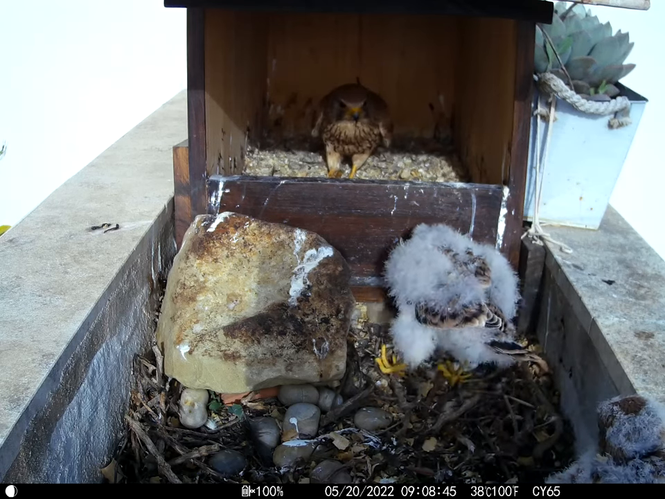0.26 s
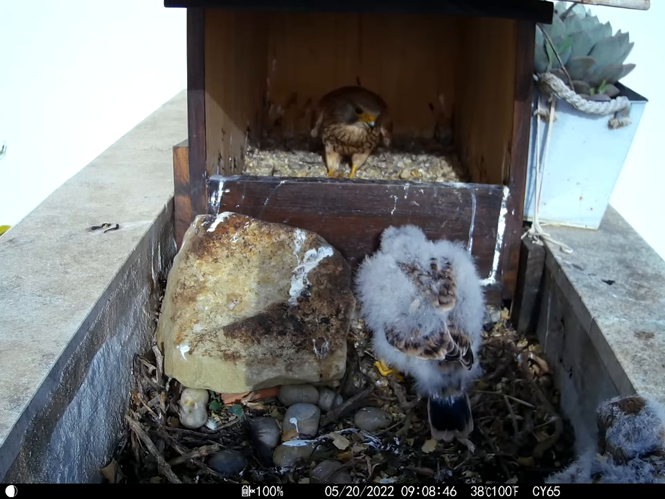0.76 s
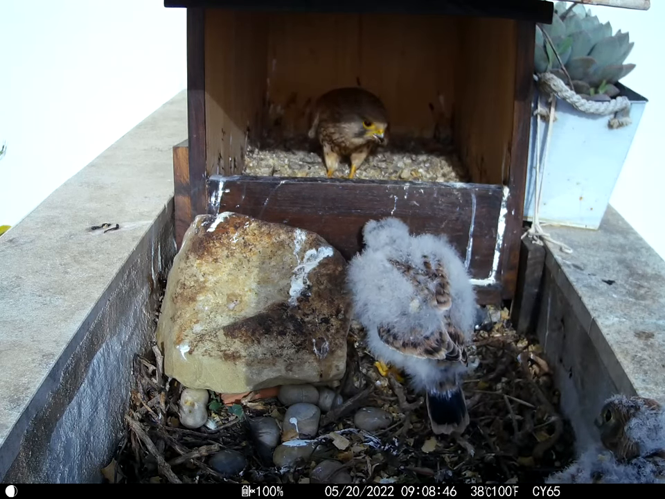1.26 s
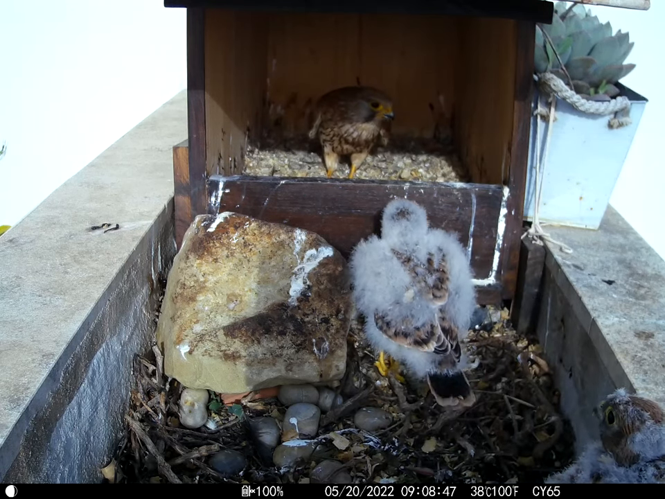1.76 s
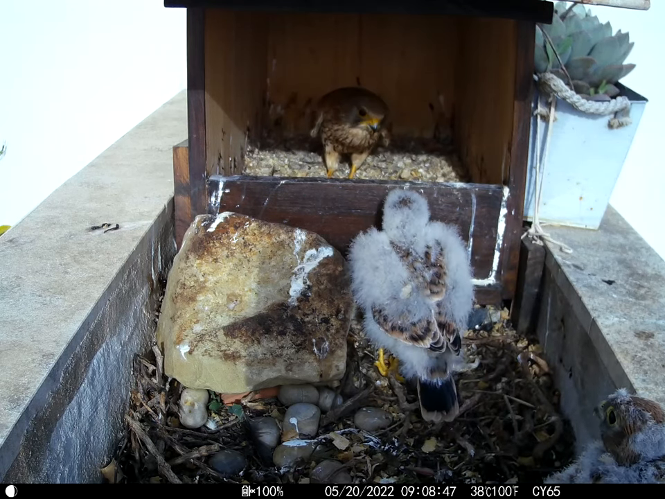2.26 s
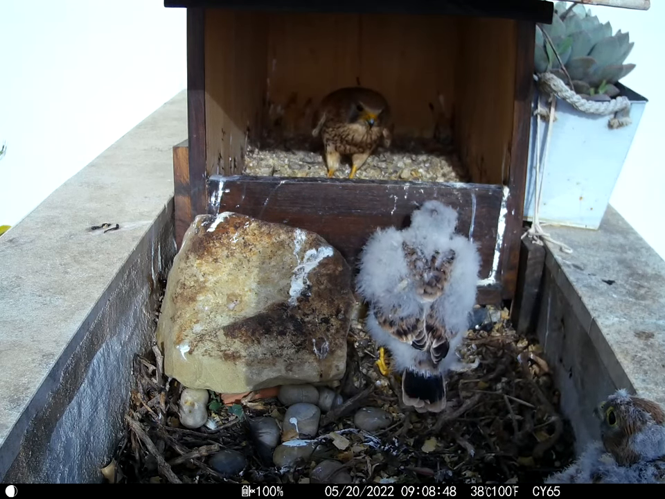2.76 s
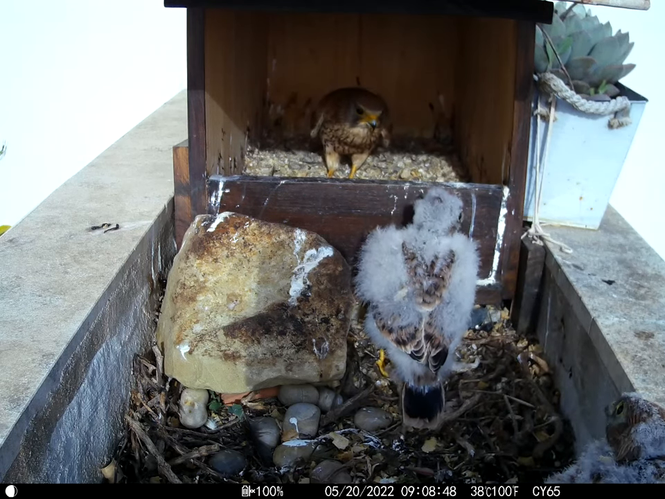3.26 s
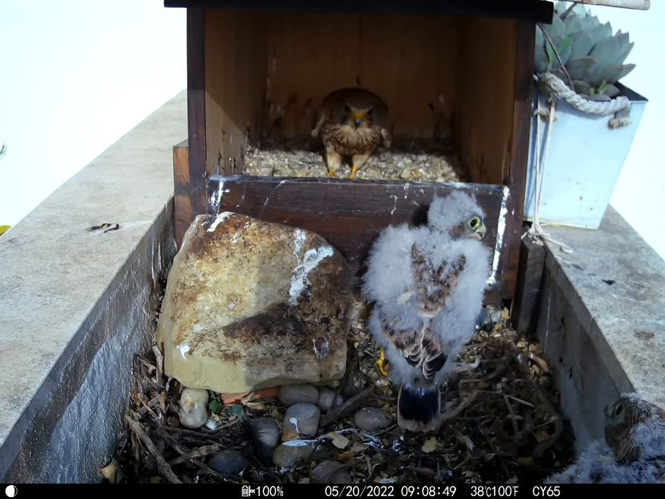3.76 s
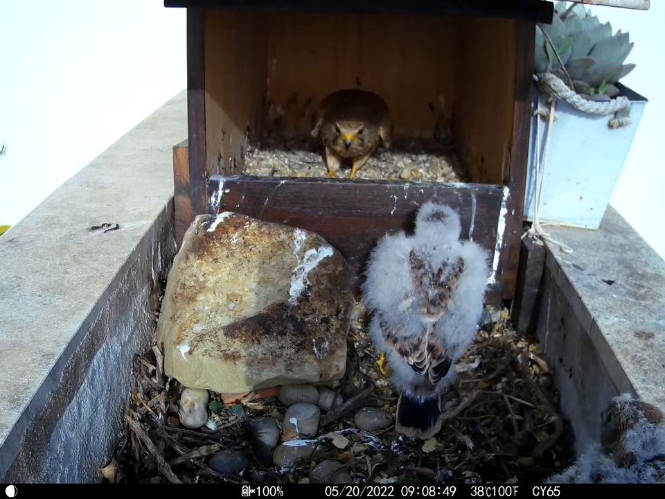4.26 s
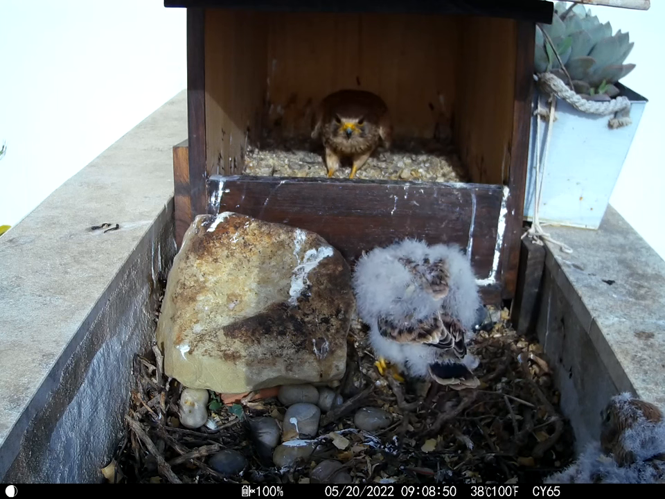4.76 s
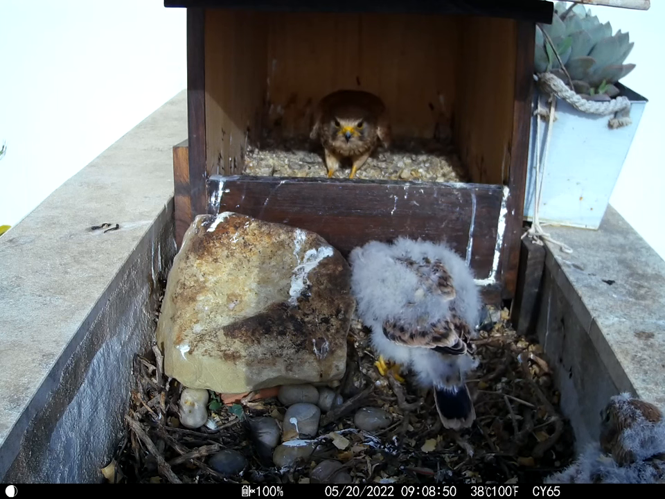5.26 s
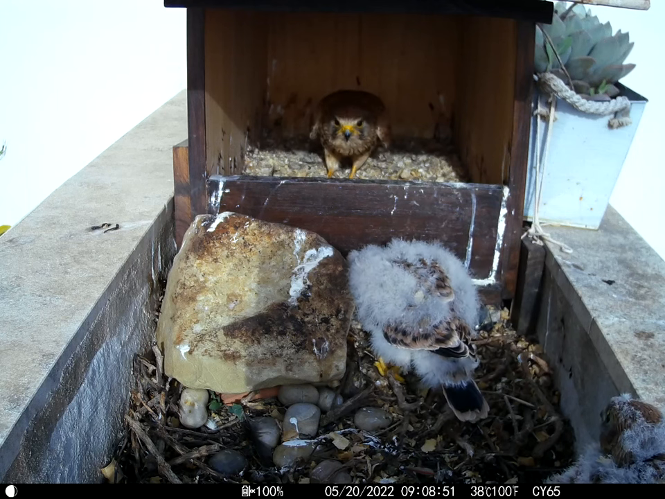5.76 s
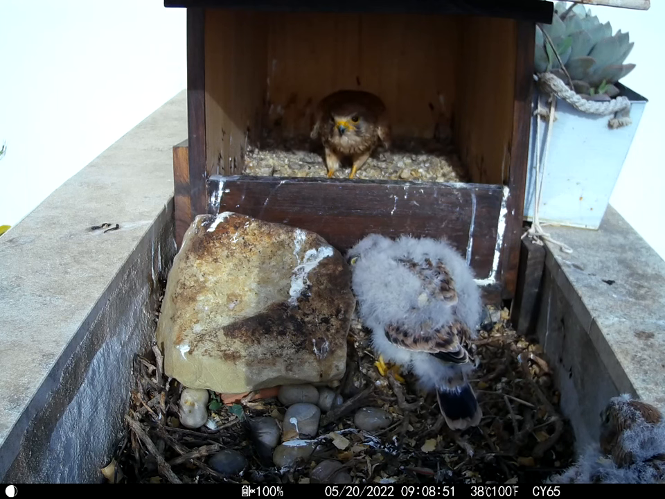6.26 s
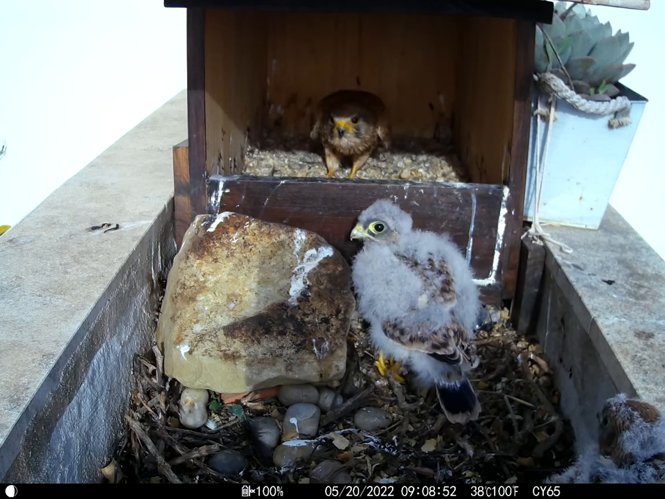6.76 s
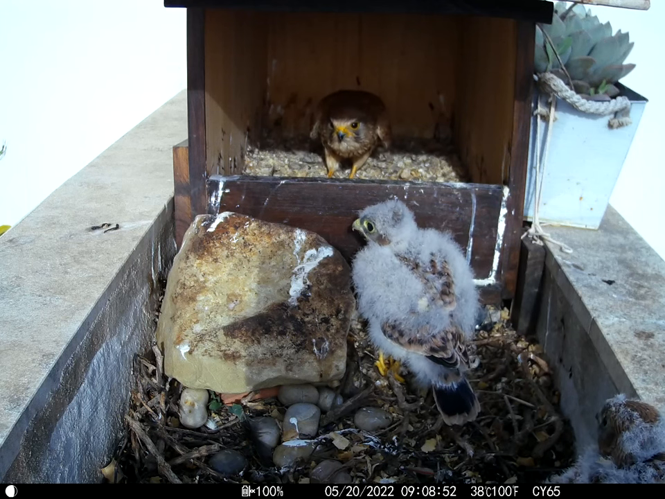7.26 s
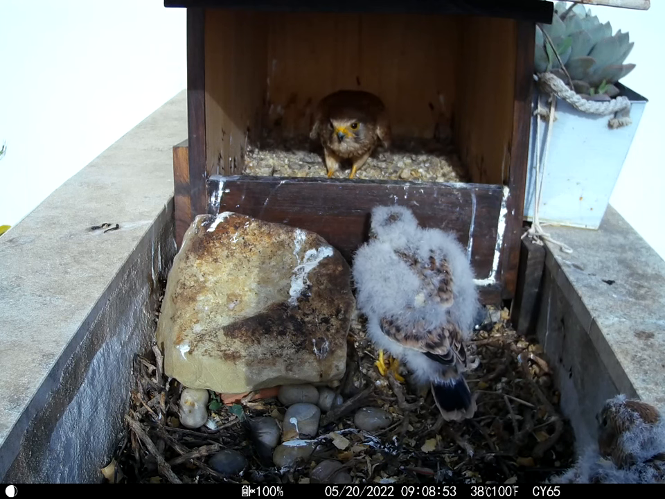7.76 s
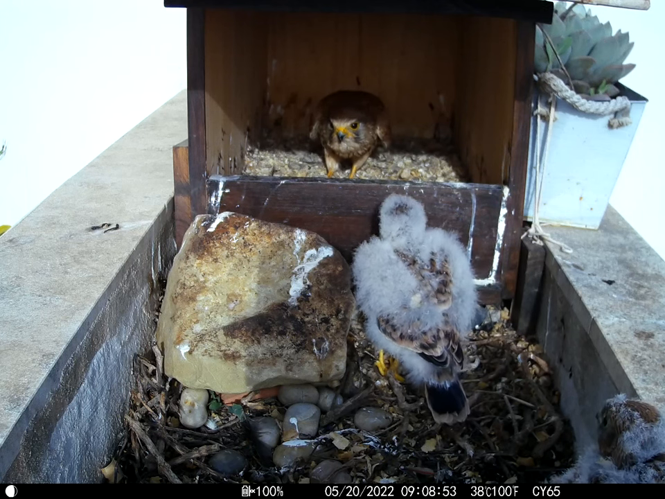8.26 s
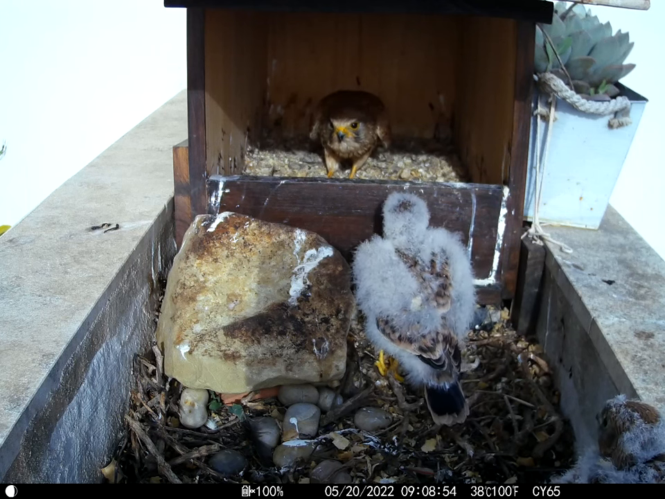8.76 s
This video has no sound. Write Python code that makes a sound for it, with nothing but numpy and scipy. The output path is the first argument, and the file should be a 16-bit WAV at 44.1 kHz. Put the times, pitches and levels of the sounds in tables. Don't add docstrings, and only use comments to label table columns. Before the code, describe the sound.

Close high trills from hungry young falcons, punctuated by seven sharp adult yelps, pause and then return over steady hiss, thin whine and ticks.

```python
import sys
import numpy as np
from scipy import signal
from scipy.fft import rfft, irfft
from scipy.io import wavfile
from scipy.ndimage import uniform_filter1d

SR = 44100
rng = np.random.default_rng(int(sys.argv[2]) if len(sys.argv) > 2 else 0)


def makeup_ratio(level_db):
    decades = np.asarray(level_db, float) / 20
    return 10 ** decades


def pcm_store(signal):
    levels = np.round(np.clip(np.atleast_2d(signal), -1, 1) * 32767)
    wavfile.write(sys.argv[1], SR, levels.astype(np.int16).T)


N = 398223
T = np.arange(N) / SR


def band(x, lo_hz, hi_hz):
    return signal.sosfilt(signal.butter(2, [lo_hz, hi_hz], "band", fs=SR, output="sos"), x)


def unit(x):
    return x / np.sqrt(np.mean(x ** 2))


def add(out, start_s, x):
    i = int(start_s * SR)
    out[i:i + len(x)] += x[:len(out) - i]


def town():
    # pitch_hz [Hz], level_db [dB per Hz]
    spectrum = [(12, -34), (20, -7.5), (113, 1), (216, -5), (357, -9.5), (6180, -26.5), (9670, -29.5),
                (16000, -31)]
    hz, db = np.transpose(spectrum)
    f = np.fft.rfftfreq(N, 1 / SR)
    tilt = makeup_ratio(np.interp(np.log(f + 1), np.log(hz), db))
    rumble = irfft(rfft(rng.standard_normal(N)) * tilt, N)
    swell = unit(uniform_filter1d(rng.standard_normal(N), SR // 3))
    return makeup_ratio(-53.5 + 1.1 * swell) * unit(rumble)


def electronics():
    # pitch_hz [Hz], level_db [dB]
    whine = [(4689, -77), (6250, -76.5), (9372, -75.5), (10939, -80)]
    beacon_first_s, beacon_every_s, beacon_length_s = .0886, .1024, .00272
    clock_first_s, clock_every_s = .4245, .9995
    out = sum(np.sqrt(2) * makeup_ratio(db) * np.sin(2 * np.pi * hz * T) for hz, db in whine)
    t = np.arange(80) / SR
    spike = np.exp(-t / 0.00026)
    step = np.exp(-t / 0.00033)
    for s in np.arange(beacon_first_s, T[-1], beacon_every_s):
        add(out, s, -makeup_ratio(-39.5) * spike)
        add(out, s + beacon_length_s, makeup_ratio(-42.5) * spike)
    for s in np.arange(clock_first_s, T[-1], clock_every_s):
        for lag_s, sign in (0, -1), (.0005, 1), (.0015, -1):
            add(out, s + lag_s, sign * makeup_ratio(-40.5) * step)
    return out


def sparrows():
    # start_s [s], length_s [s], first_hz [Hz], last_hz [Hz], level_db [dB]
    peeps = [
        (7.13, 0.056, 4550, 4400, -62),
        (4.6, .06, 3300, 3000, -60),
        (7.656, 0.081, 4550, 4700, -65),
        (2.396, 0.022, 4000, 3800, -54),
    ]
    out = np.zeros(N)
    for s, length_s, first_hz, last_hz, db in peeps:
        n = int(length_s * SR)
        turn = 2 * np.pi * np.cumsum(np.linspace(first_hz, last_hz, n)) / SR
        add(out, s, 2 * makeup_ratio(db) * np.sin(turn) * np.hanning(n))
    return out


def litter():
    # start_s [s], length_s [s], pitch_hz [Hz], level_db [dB]
    rustles = [
        (4.086, 0.045, 3500, -59),
        (4.293, 0.055, 2180, -55),
        (5.59, 0.12, 5800, -60),
        (7.074, 0.075, 3200, -58.5),
        (7.551, 0.1, 3020, -60),
        (8.121, 0.033, 990, -51),
    ]
    out = np.zeros(N)
    for s, length_s, hz, db in rustles:
        grit = rng.standard_normal(8192) ** 3
        n = int(length_s * SR)
        add(out, s, makeup_ratio(db) * unit(band(grit, hz / 2, hz * 2))[:n] * np.hanning(n))
    return out


def beak_snaps():
    # [dB, peak]
    snaps = [(0.599, -26.5), (1.1492, -27.5), (1.6866, -28.5), (2.278, -27), (3.0795, -27.5), (3.611, -29),
             (4.7316, -26)]
    out = np.zeros(N)
    t = np.arange(int(0.012 * SR)) / SR
    for s, db in snaps:
        grit = rng.standard_normal(len(t)) ** 2 * rng.choice([-1, 1], len(t))
        grit *= np.clip(1 - t / 0.0077, 0, 1) ** 0.3
        grit[0] = -8
        dull = unit(band(grit, 1300, 3320))
        bright = unit(band(grit, 2000, 6100))
        add(out, s, makeup_ratio(db - 11.5) * (dull + (.3 + t / .012) * 0.99 * bright))
    return out


def parent_yelps():
    # start_s [s], open_hz [Hz], broken_hz (pitch after the break) [Hz], level_db [dB], break_ms [ms]
    yelps = [(0.6246, 2890, 2930, -15, 3.2), (1.1741, 2940, 2974, -15.5, 3.7),
             (1.7112, 2870, 2958, -17.5, 6.4), (2.3022, 2905, 2870, -16.5, 7),
             (3.1043, 2795, 2827, -14.5, 5.7), (3.635, 2813, 2850, -14.5, 7.5),
             (4.7559, 2940, 3148, -13.5, 4.7)]
    odd_levels = [-3, -4, -3, -4.5, -2, -3.5, 3]
    open_levels = [0.5, 1, -14.5]
    broken_levels = [-6, -2.5, -2, -8, -18.5, -22]
    length_ms = 16.4
    out = np.zeros(N)
    t = np.arange(int(.07 * SR)) / SR
    ms = t * 1000
    for (s, open_hz, broken_hz, db, break_ms), odd_db in zip(yelps, odd_levels):
        broken = np.clip((ms - break_ms) / 2.15 + .5, 0, 1)
        hz = (open_hz + (broken_hz - open_hz) * broken) * (1 + 0.3 * np.exp(-t / 0.00087))
        shake = (0.013 + 0.013 * (ms / length_ms) ** 2) * unit(band(rng.standard_normal(len(t)), 150, 1180))
        turn = np.pi * np.cumsum(hz * (1 + shake)) / SR
        first = sum(makeup_ratio(d) * np.sin(2 * (k + 1) * turn) for k, d in enumerate(open_levels))
        second = sum(makeup_ratio(d + odd_db * (k in (2, 4))) * np.sin((k + 1) * turn - 1.3 * k ** 2)
                     for k, d in enumerate(broken_levels))
        air = rng.standard_normal(len(t)) * (1 + 0.27 * np.cos(turn))
        late = np.exp(-((ms - 0.65 * length_ms) / 4.8) ** 2)
        rasp = late * makeup_ratio(-11.5) * unit(band(air, 3700, 15500))
        attack = 1 - np.exp(-(t / 0.002) ** 2)
        shape = attack / (1 + np.exp((ms - 0.88 * length_ms) / 0.65))
        hiss = makeup_ratio(-28.5) * unit(band(air, 1980, 15000)) * np.exp(-t / 0.025) * (ms > length_ms / 2)
        voice = (1 - broken) * first + broken * second + rasp
        add(out, s, makeup_ratio(db) * (shape * voice + hiss))
    return out


def rising(rows):
    s, *rest = np.transpose(rows)
    return np.maximum.accumulate(np.maximum(s, 0)) + 1e-5 * np.arange(len(s)), *rest


def phrase(pulses, breath, voice):
    lead_s, tail_s, first_db, last_db = breath
    low_at, climb, upper_db = voice
    s, hz, sag, low, high = pulses[0]
    turns = [(s - lead_s, hz * (1 - climb * lead_s))]
    levels = [(s - lead_s, low - first_db, high - first_db - upper_db)]
    for k, (s, hz, sag, low, high) in enumerate(pulses):
        fade = first_db + (last_db - first_db) * k / max(len(pulses) - 1, 1)
        thin = np.clip((fade - 4.5) / (12 - 4.5), 0, 1)
        muted = 0.82 * thin
        turns.append((s, hz))
        levels.append((s, low - muted * fade, high - muted * (fade + upper_db)))
        if k + 1 < len(pulses):
            period = pulses[k + 1][0] - s
            turns.append((s + low_at * period, hz - sag))
            levels.append((s + .27 * thin * period, low, high))
            levels.append((s + (low_at + 0.079 * thin) * period, low - fade, high - fade - upper_db))
    hold_s = .55 * tail_s
    turns += [(s + hold_s, hz - 0.37 * sag), (s + tail_s, hz - sag)]
    levels += [(s + hold_s, low, high - 3), (s + tail_s, low - 14.5, high - 14.5 - 16)]
    return rising(turns), rising(levels)


def glide(s, hz, t):
    slope = np.diff(hz) / np.diff(s)
    inner = np.where(slope[1:] * slope[:-1] > 0, (slope[1:] + slope[:-1]) / 2, 0)
    m = np.r_[slope[0], inner, slope[-1]]
    k = np.clip(np.searchsorted(s, t) - 1, 0, len(slope) - 1)
    width = np.diff(s)[k]
    v = (t - s[k]) / width
    bend = (m[k] - slope[k]) * (1 - v) - (m[k + 1] - slope[k]) * v
    return hz[k] + v * width * (slope[k] + (1 - v) * bend)


def chick(knots, partials_db, flutter, wobble):
    (s, hz), (at, low_db, high_db) = knots
    t = np.arange(s[0], s[-1], 1 / SR)
    i = int(s[0] * SR)
    here = slice(i, i + len(t))
    pitch = glide(s, hz, t)
    closed = np.clip(np.gradient(pitch) * SR / pitch / 2.5, 0, 1)
    muffle_db = 3 * (hz[0] > 2000)
    turn = 2 * np.pi * np.cumsum(pitch * (1 + wobble[here])) / SR
    levels = partials_db(np.interp(t, at, low_db), np.interp(t, at, high_db))
    voice = sum(makeup_ratio(db - muffle_db * min(k + 1, 3) * closed) * np.sin((k + 1) * turn)
                for k, db in enumerate(levels))
    edges = np.clip(np.minimum(t - s[0] + (s[0] < .003), s[-1] - t) / .004, 0, 1)
    return s[0], np.sqrt(2) * voice * edges * (1 + flutter[here])


def chicks():
    # crest_s [s], crest_hz [Hz], sag_hz [Hz], fundamental_db [dB], third_db [dB]
    deep = [
        [(.004, 1660, 292, -41, -46), (.08, 1650, 326, -39, -46), (.14, 1353, 190, -45.5, -59)],
        [(.403, 1443, 140, -42, -48.5), (.507, 1445, 181, -43, -50.5), (.591, 1546, 242, -42.5, -44.5),
         (.686, 1562, 420, -44, -48.5)],
        [(1.066, 1560, 161, -47, -48), (1.137, 1556, 238.5, -46, -47.5), (1.253, 1617, 310, -43, -44),
         (1.33, 1295, 165, -47.5, -69)],
    ]
    # crest_s [s], crest_hz [Hz], sag_hz [Hz], fundamental_db [dB], octave_db [dB]
    whistles = [
        [(.055, 3395, 385, -44, -37.5), (.152, 3340, 265, -44.5, -38), (.243, 3290, 380, -45, -34)],
        [(.387, 3530, 680, -39.5, -45)],
        [(.495, 3480, 400, -50, -52)],
        [(.572, 3280, 271, -43, -46), (.635, 3430, 160, -46, -46), (.73, 3340, 285, -45, -42)],
        [(.836, 3270, 147, -44, -38), (.896, 3294, 363, -45, -37)],
        [(1.042, 3670, 580, -46.5, -45)],
        [(1.229, 3300, 240, -48, -46), (1.295, 3270, 220, -45, -42)],
        [(1.395, 3376, 202, -42, -35.5), (1.475, 3184, 344, -44, -37), (1.562, 3120, 376, -41, -41)],
    ]
    swells = [
        [(1.78, 3550, 690, -50.5, -56)],
        [(1.88, 3500, 392, -52, -75), (1.96, 3560, 250, -47.5, -60), (2.039, 3630, 364, -47.5, -61),
         (2.127, 3660, 319, -48, -59), (2.211, 3520, 298, -47, -57), (2.33, 3500, 358, -45, -53),
         (2.46, 3340, 30.2, -38.5, -40.5), (2.542, 3485, 235, -37.5, -43), (2.614, 3300, 760, -38, -46)],
        [(2.787, 3450, 460, -46.5, -37)],
        [(2.862, 3490, 489, -47.5, -45.5), (2.957, 3420, 504, -50, -48.5), (3.053, 3360, 230, -47, -46.5)],
        [(3.127, 3290, 60, -44, -50), (3.207, 3560, 158, -45.5, -43.5), (3.302, 3500, 200, -42.5, -48),
         (3.37, 3277, 101, -44, -39.5), (3.454, 3313, 350, -40.5, -40), (3.538, 3104, 520, -41, -41.5)],
    ]
    trills = [
        [(3.652, 3420, 70, -45, -56), (3.728, 3780, 240, -45, -54), (3.823, 3630, 405, -44.5, -44.5),
         (3.915, 3710, 460, -42, -48), (4.007, 3630, 394, -42.5, -49), (4.099, 3590, 590, -45, -47.5)],
        [(4.176, 3485, 468, -47, -52), (4.332, 3517, 670, -35.5, -33.5)],
        [(4.434, 3480, 390, -48, -53.5), (4.502, 3570, 513, -46.5, -45), (4.59, 3455, 428, -46.5, -42),
         (4.685, 3320, 450, -49, -43), (4.789, 3480, 970, -53, -45)],
        [(5.064, 3470, 528, -42.5, -45), (5.152, 3630, 477, -46, -52), (5.244, 3550, 574, -42.5, -48),
         (5.344, 3365, 500, -40.5, -47.5), (5.448, 3380, 550, -42.5, -47.5), (5.512, 2990, 566, -46.5, -53.5)],
    ]
    resumed = [
        [(7.755, 3550, 298, -67, -80), (7.844, 3590, 526, -62, -73), (7.932, 3580, 469, -56, -66),
         (8.028, 3610, 450, -53.5, -58.5), (8.12, 3560, 500, -49.5, -51.5), (8.215, 3510, 870, -48, -49)],
        [(8.477, 3370, 290, -44, -45.5)],
        [(8.56, 3600, 422, -49, -73), (8.656, 3670, 500, -45, -58), (8.752, 3590, 485, -43.5, -50),
         (8.844, 3590, 486, -41.5, -47), (8.948, 3575, 890, -41.5, -41)],
    ]
    sibling = [
        [(.125, 3420, 940, -41.5, -42)],
        [(.685, 3430, 380, -50, -56)],
        [(.795, 3390, 950, -50, -51)],
        [(1.495, 3440, 380, -57, -50)],
        [(2.19, 3570, 140, -52, -72), (2.25, 3570, 110, -48, -46)],
        [(2.375, 3580, 200, -46, -50), (2.475, 3720, 199, -56, -70), (2.57, 3430, 540, -56, -45.5)],
        [(3.554, 3550, 404, -51.5, -78)],
        [(4.031, 4400, 270, -49, -80)],
        [(4.117, 4580, 350, -48, -80)],
    ]
    # run_up_s [s], dying_fall_s [s],
    # first_fade_db (between the first pulses) [dB], last_fade_db [dB]
    deep_breath = [(.004, 0.02, 6.5, 10.5), (.032, 0.042, 5, 4), (0.045, .03, -5, 5.5)]
    whistle_breath = [(0.043, .046, 1.2, 5.4), (0.0037, .049, 18, 20), (0.029, 0.049, 3, 3),
                      (.025, 0.036, 1.3, 3.2), (0.063, 0.059, 4.9, 5.5), (0.0033, 0.055, 15, 13),
                      (0.03, 0.049, 1.5, 3), (.048, .062, 2.7, 1.4), (.004, 0.044, 11, 11),
                      (0.0033, 0.042, 12.4, 2.6), (.004, 0.022, 21, 14), (.004, 0.047, 13.4, 10.4),
                      (0.0046, .028, 13.4, 2.5), (.004, 0.05, 23, 7.5), (0.0053, 0.11, 2.8, 3),
                      (0.0037, 0.067, 22, 7.9), (.004, 0.027, 20, 1.5), (0.033, 0.05, 2.7, 8.8),
                      (.004, 0.029, 11.6, 14), (0.0037, 0.047, 20, 12.4)]
    sibling_breath = [(0.0049, .07, 20, 20), (0.0275, .035, 2.7, 3), (0.0047, .067, 3, 3),
                      (0.03, 0.043, 3, 3), (0.0043, 0.026, 3, 3), (.03, 0.0464, 18, 3),
                      (0.0071, 0.048, 3, 3), (.004, 0.031, 22, 22), (.004, 0.049, 16, 21)]
    beak_open = [-9.5, 2, -7, -0.5, -0.5, -3, -6, -19.5, -20, -22, -32, -9, -25, -14.5, -22, -3, -4.5, -15,
                 -25, -17]
    deep_bright = [4, 4.5, 0, -6.5, -10, -5, -15]
    deep_voice, whistle_voice = (.48, 3.0, 12.6), (0.48, 1.5, 4.8)

    out = np.zeros(N)
    flutter = .06 * unit(band(rng.standard_normal(N), 40, 300))
    wobble = .003 * unit(band(rng.standard_normal(N), 15, 80))

    def deep_partials(low, third):
        return [low, low - 2.5] + [third + d for d in deep_bright]

    for pulses, breath in zip(deep, deep_breath):
        add(out, *chick(phrase(pulses, breath, deep_voice), deep_partials, flutter, wobble))

    whistled = whistles + swells + trills + resumed + sibling
    breaths = whistle_breath + sibling_breath
    openings = beak_open + [-13] * len(sibling)
    for pulses, breath, open_db in zip(whistled, breaths, openings):
        def whistle_partials(low, octave):
            return [low, octave, 1.3 * octave + 14 + open_db, 1.03 * octave + 0.49 * open_db - 15.0]

        add(out, *chick(phrase(pulses, breath, whistle_voice), whistle_partials, flutter, wobble))
    return out


def box(dry):
    t = np.arange(int(.3 * SR)) / SR
    boards = makeup_ratio(-35.5) * np.exp(-np.log(1000) * t / 0.038)
    walls = makeup_ratio(-48.5) * np.exp(-np.log(1000) * t / 0.2)
    echoes = band(rng.standard_normal(len(t)), 1100, 15000) * (boards + walls) * (t > .002)
    return dry + signal.fftconvolve(dry, echoes)[:N]


def scene():
    birds = chicks() + parent_yelps() + beak_snaps() + litter() + sparrows()
    return (box(birds) + town() + electronics())[None]


def low_pass(x):
    return signal.sosfilt(signal.butter(12, 16440, fs=SR, output="sos"), x)


def record(dry):
    # start_s [s], length_s [s]
    treble_drops = [(.355, .022), (.608, .026), (.991, .056), (1.156, .02), (1.663, .059), (2.301, .028),
                    (2.782, .028), (3.1, .03), (3.586, .056), (4.735, .027), (8.478, .028)]
    f = np.fft.rfftfreq(N, 1 / SR)
    dry = irfft(rfft(dry) * (f < 15800), N)
    gaps = sum((T > s) & (T < s + length_s) for s, length_s in treble_drops)
    treble = irfft(rfft(dry) * np.clip((f - 8600) / 300, 0, 1), N)
    mix = dry - treble * uniform_filter1d(1. * gaps, 90)
    return low_pass(mix)


dry = scene()
out = record(dry)
pcm_store(out)
```